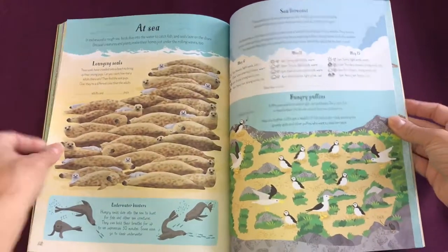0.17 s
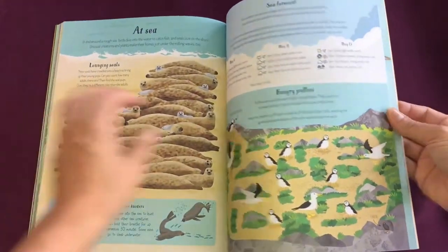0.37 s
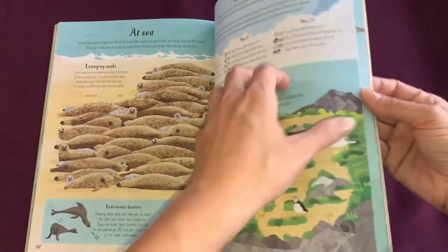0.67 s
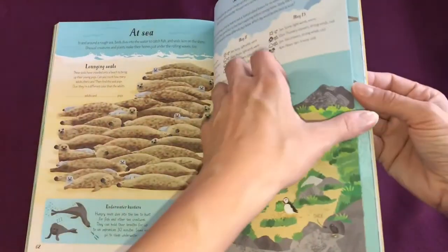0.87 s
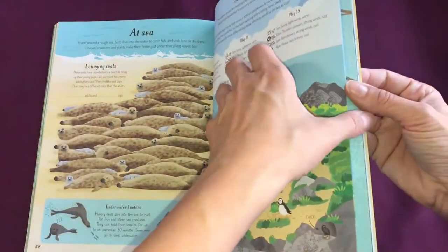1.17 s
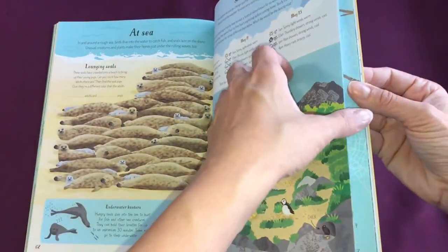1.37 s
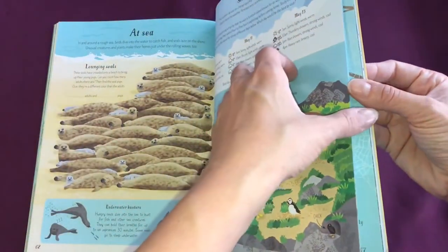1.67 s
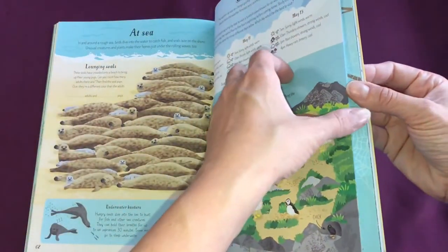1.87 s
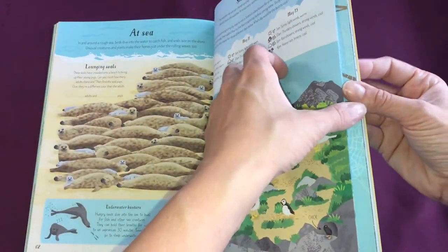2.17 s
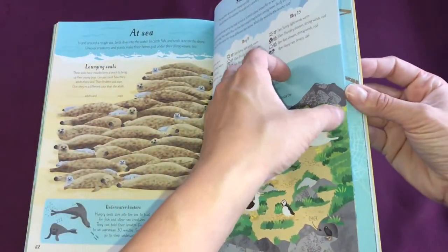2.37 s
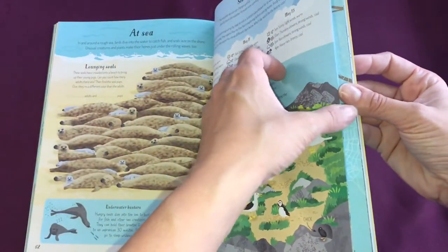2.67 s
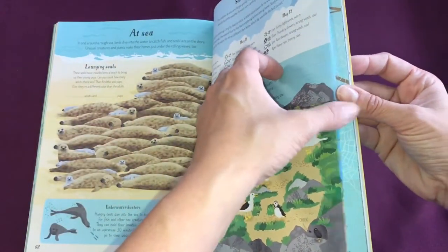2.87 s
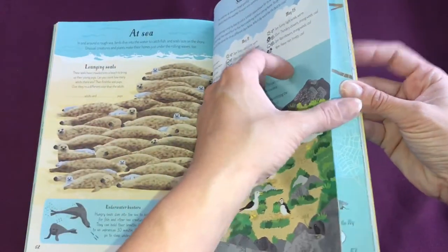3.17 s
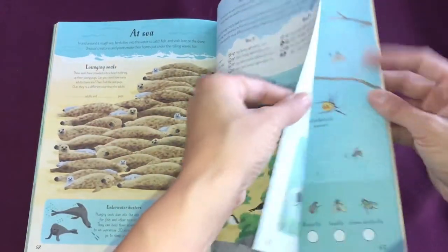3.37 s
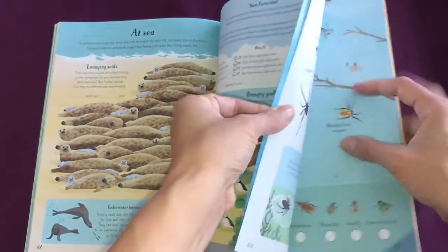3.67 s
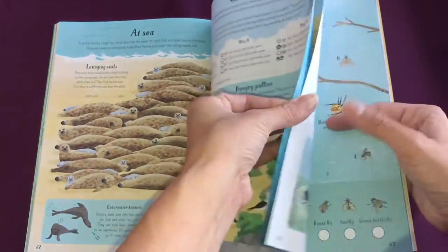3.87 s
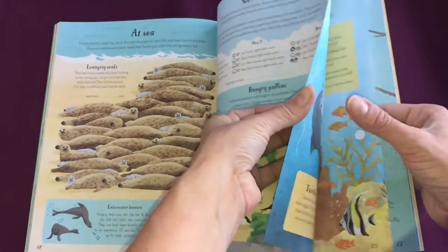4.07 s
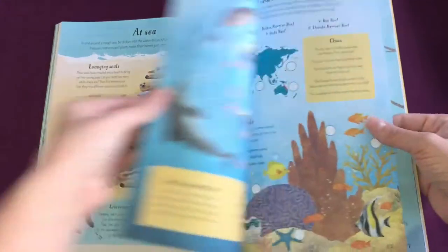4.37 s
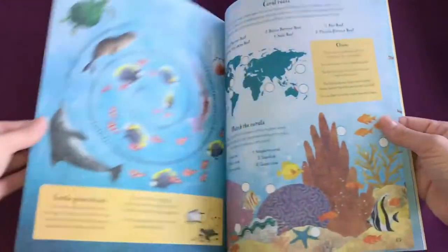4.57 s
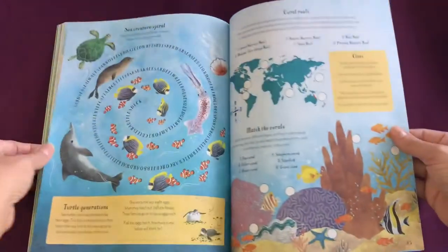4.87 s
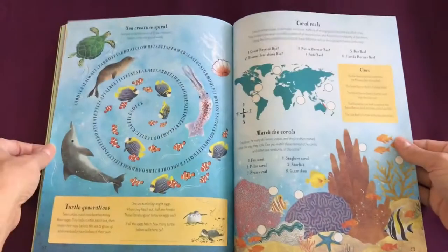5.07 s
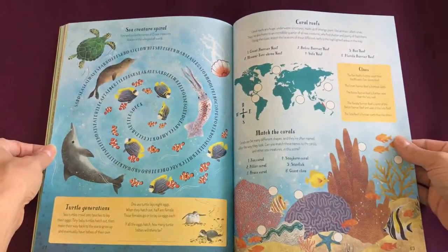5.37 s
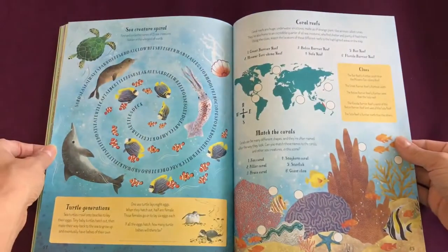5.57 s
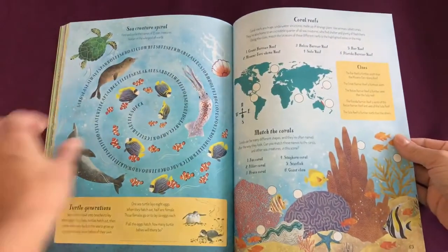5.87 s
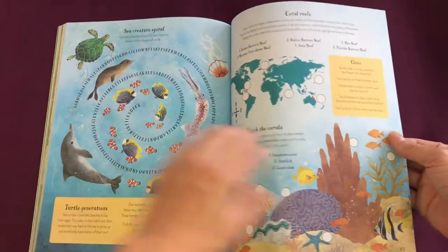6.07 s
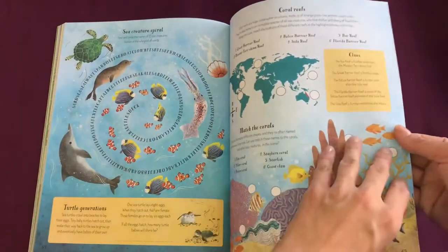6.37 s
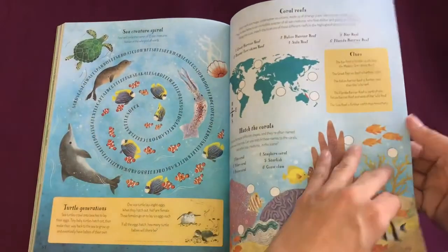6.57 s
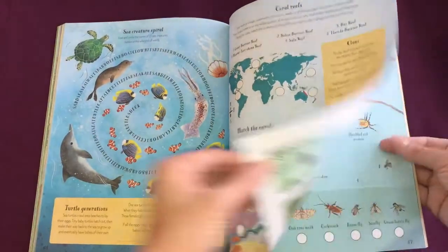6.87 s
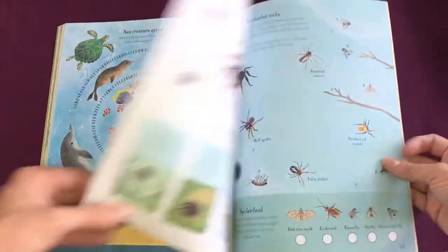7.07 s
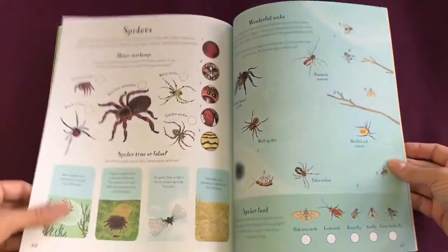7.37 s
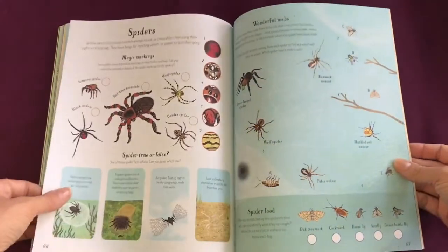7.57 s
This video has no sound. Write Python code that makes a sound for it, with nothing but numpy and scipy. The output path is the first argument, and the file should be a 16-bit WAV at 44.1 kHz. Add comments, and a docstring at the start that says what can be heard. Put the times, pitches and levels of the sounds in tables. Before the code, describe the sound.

Close to the microphone, hands handle a large glossy paperback in a small room with a steady low mains hum. Fingertips tap, scuff and squeak faintly on the paper, then a sheet is separated and turned with a cluster of crisp buckling snaps and grainy swishes. After a quieter pause with a few small clicks, a second page turns more softly and flaps down with a light pop.

```python
"""Two pages of a large paperback are turned by hand in a small room with a humming appliance.
Fingers scuff the paper (shaped clicks and hiss), slip with a click and rub on it with a dry squeak
(a gliding resonance). Each lifted sheet snaps as it buckles (short rings and noise cracks), slides over
its neighbour with a grainy swish (clicks with an echo from the page below) and pops softly as a finger
releases it or as it flaps down (a falling tone). Wavering sines and shaped noise make the hum and room."""
import sys
import numpy as np
from scipy import signal
from scipy.fft import rfft, irfft, next_fast_len
from scipy.io import wavfile
from scipy.ndimage import map_coordinates

SR = 44100
rng = np.random.default_rng(int(sys.argv[2]) if len(sys.argv) > 2 else 0)


def digitize_waveform(pressure):
    """Quantize a signal to 16-bit integers and store it at the path in sys.argv[1].

    Rows of a 2-D input are taken as channels; values are limited to [-1, 1].
    """
    field = np.atleast_2d(pressure).T
    bounded = np.clip(field, -1, 1)
    quanta = np.round(bounded * 32767).astype(np.int16)
    wavfile.write(sys.argv[1], SR, quanta)


N = 340893
TIME = np.arange(N) / SR  # seconds

# the sheet slides over its neighbour: start/s, length/s, swish level/dB, edge hiss level/dB,
# pitch of the gap halfway through/Hz, tilt/dB per octave
SLIDES = [(3.221, 0.081, -64.5, -60.5, 1180, 3), (3.325, 0.04, -57.5, -64, 1790, 7),
          (3.372, 0.069, -51.5, -55.5, 1910, 2), (3.484, 0.097, -58, -62, 1160, 2),
          (3.653, 0.04, -49.5, -48.5, 1690, 14), (3.727, 0.01, -47.5, -56, 1680, -7),
          (3.734, 0.1, -52.5, -53.5, 1730, 6), (3.877, 0.067, -56, -55.5, 1370, 1),
          (3.936, 0.048, -48.5, -54, 2110, -5.5), (4.003, 0.047, -48.5, -52.5, 1370, 2),
          (4.138, 0.1, -57.5, -63.5, 1150, 3), (4.263, 0.033, -50.5, -51.5, 1830, 1),
          (4.352, 0.12, -53.5, -67, 3500, 1), (4.47, 0.15, -61, -74, 1190, -4),
          (4.649, 0.077, -58, -65, 1300, 0), (4.82, 0.077, -56.5, -61.5, 1410, -5),
          (4.9, 0.14, -68.5, -78, 1310, 1), (6.448, 0.079, -61, -61, 2470, 3.5),
          (6.548, 0.042, -61.5, -61.5, 2500, 5), (6.614, 0.11, -58, -58.5, 2650, 6),
          (6.77, 0.044, -52, -56, 2240, -2), (6.845, 0.034, -57, -55, 1820, -6),
          (6.894, 0.025, -55, -55.5, 1750, 1), (6.933, 0.12, -53.5, -60.5, 1960, -1.5),
          (7.088, 0.15, -58, -65.5, 2260, 1), (7.358, 0.036, -60.5, -63, 1250, 7),
          (7.387, 0.12, -68, -65, 1800, -2), (7.536, 0.038, -71, -73, 1820, 0)]
# colour of scuffed paper, also of ticking creases: f/Hz, level/dB
SCUFFED_PAPER = [(300, -30), (900, -11.5), (1700, -12.5), (2300, -11), (3700, -2.5), (5000, -6.5),
                 (9500, -6), (10700, -8.5), (12500, -6.5), (15500, -12.5)]


def turning_sheets():
    """The sheet rumbles as it bends, swishes and ticks as it slides and hisses along its edge."""
    # how hard the sheet is bent as it is lifted, swung over and left to settle,
    # one curve a turn: t/s, level/dB
    bend_curves = [
        [(3.05, -76), (3.23, -72), (3.29, -60), (3.55, -60.5), (3.62, -65.5), (3.79, -52), (4.04, -57.5),
         (4.3, -61.5), (4.42, -57), (4.62, -65), (4.71, -53.5), (4.77, -72), (4.84, -61), (5.0, -66),
         (5.9, -79.5)],
        [(6.55, -92), (6.65, -60.5), (6.78, -76), (6.94, -63.5), (7.12, -69), (7.22, -60.5), (7.25, -59),
         (7.31, -74), (7.38, -52), (7.43, -77), (7.7, -75)],
    ]
    # colour of the bending rumble: f/Hz, level/dB
    flex_colour = [(150, -28), (330, 6), (560, -4.5), (860, 1.5), (1400, -4), (2200, -10), (4000, -44)]
    # colour of the edge hiss: f/Hz, level/dB
    edge_colour = [(3500, -10), (6000, 2), (7500, -0.5), (9700, 1), (10600, -6.5), (12500, -2.5),
                   (15500, -9.5)]
    # a bent sheet drags lightly all the time, and a sliding sheet bends a little
    drag_db, drag_edge_db, slide_bends_db = 1, -14, -17.5
    tick_db = -17

    bend = 0
    for turn in bend_curves:
        times, levels = np.transpose(turn)
        bend = bend + from_db(np.interp(TIME, times, levels, left=-200, right=-200))
    sliding, edge_on = 0, 0
    for start, length, swish_db, edge_db, _, _ in SLIDES:
        gain = slide_stroke(start, length)
        sliding = sliding + from_db(swish_db) * gain
        edge_on = edge_on + from_db(edge_db) * gain
    flex = np.hypot(bend, from_db(slide_bends_db) * sliding)
    slide = np.hypot(sliding, from_db(drag_db) * bend)
    edge = np.hypot(edge_on, from_db(drag_edge_db) * bend)

    grain = friction(slips_per_s=2500, spread_db=-0.5, smooth_db=0.5)
    grain = grain * from_db(2.1 * drift(47))  # uneven level
    crumple = friction(slips_per_s=770, spread_db=6.5, smooth_db=0.0)
    body = flex * page_gap(coloured(crumple, flex_colour), lag_ms=4.17, swing=0.16, echo=0.32)
    swish = swishes(grain, echo=0.42, closing=0.15)
    hiss = edge * page_gap(coloured(grain, edge_colour), lag_ms=0.588, swing=0.437, echo=0.38)
    return body + swish + hiss + from_db(tick_db) * slide * creases()


def swishes(grain, echo, closing):
    """Each slide has its own brightness and echo off the page below; the gap closes, so its peaks rise."""
    # colour of a swish before its own tilt: f/Hz, level/dB
    slide_colour = [(700, -23), (1300, 9), (1700, 6.5), (2400, 8.5), (4000, 9.5), (5000, -4), (6000, -15),
                    (9000, -52)]
    out = np.zeros(N)
    for start, length, db, _, gap_hz, tilt_db in SLIDES:
        span = slice(int((start - length) * SR), int((start + 2 * length) * SR))
        t = TIME[span]
        tilted = [(hz, level + tilt_db * np.log2(hz)) for hz, level in slide_colour]
        swish = rms_one(coloured(grain[span], tilted))
        progress = np.clip((t - start) / length - .5, -1, 1)  # 0 halfway through
        lag_s = np.exp(-closing * progress) / gap_hz
        mirrored = np.interp(t - lag_s, t, swish)
        out[span] += from_db(db) * slide_stroke(start, length)[span] * (swish + echo * mirrored)
    return out / np.hypot(1, echo)


def creases():
    """Creases give sparse dry ticks of uneven size, each a tiny fading puff of noise; rms 1."""
    ticks_per_s, spread_db, fade_s = 70, -1, 0.0015
    born = rng.random(N) < ticks_per_s / SR
    sizes = from_db(spread_db * np.minimum(rng.exponential(1, N), 2))
    bursts = signal.lfilter([1], [1, -np.exp(-1 / (fade_s * SR))], born * sizes + 1e-18)
    return rms_one(coloured(bursts * rng.standard_normal(N), SCUFFED_PAPER))


def air_pockets():
    """Friction rings the air under a curled sheet; the resonance glides as the curl changes."""
    # start/s, length/s, level/dB, resonance from f/Hz, to f/Hz, sharpness Q [no unit]
    pockets = [(0.196, 0.032, -61, 6700, 6440, 10), (0.304, 0.14, -68, 1330, 1250, 7),
               (0.31, 0.017, -63, 8300, 8300, 7), (0.347, 0.094, -72, 7300, 6970, 4),
               (0.604, 0.025, -59, 915, 930, 9.1), (0.61, 0.072, -62, 3400, 3800, 6.4),
               (1.217, 0.073, -67, 6120, 5730, 6), (2.716, 0.06, -71, 1780, 2005, 6),
               (3.66, 0.015, -49, 3740, 3700, 11), (3.659, 0.036, -46.5, 1575, 1590, 3.6),
               (4.378, 0.12, -55.5, 980, 1145, 8.6), (4.402, 0.045, -53, 4150, 3700, 6.9),
               (4.426, 0.17, -64, 9070, 7300, 6), (4.662, 0.041, -52, 7700, 9120, 5.6),
               (4.682, 0.04, -55, 606, 588, 2.2), (6.619, 0.082, -64, 4140, 5180, 5.4),
               (6.765, 0.1, -63.5, 2240, 1693, 4.8), (6.892, 0.044, -53, 1554, 1660, 6),
               (6.897, 0.053, -58, 3730, 4200, 9), (6.98, 0.082, -55, 5000, 5680, 7.5),
               (7.095, 0.058, -56.5, 6800, 7100, 16), (7.103, 0.088, -59.5, 3940, 4190, 14),
               (7.182, 0.077, -62.5, 7730, 8300, 8.7), (7.236, 0.017, -54, 897, 797, 3.3),
               (7.251, 0.17, -71, 1304, 992, 2.6)]
    grain = friction(slips_per_s=3300, spread_db=4.0, smooth_db=0.0)
    out = np.zeros(N)
    for start, length, db, from_hz, to_hz, sharpness in pockets:
        ringing = rms_one(signal.lfilter(*signal.iirpeak(from_hz, sharpness, fs=SR), grain))
        # reading the sound faster or slower moves its pitch
        speed = np.interp(TIME, [start, start + length], [1, to_hz / from_hz])
        gliding = np.interp(np.cumsum(speed) / SR, TIME, ringing)
        out += from_db(db) * slide_stroke(start, length) * gliding
    return out


def snaps_and_clicks(crack_lead, flutter_s, flutter_db, glide):
    """A buckle or a slipping fingertip rings the sheet a few cycles, with a crack and a brief flutter."""
    # the sheet buckles or a fingertip slips with a click: t/s, thump level/dB, thump f/Hz,
    # extra level of the top mode/dB, crack level/dB, crack rise/s
    snap_list = [(.176, -38.5, 3200, -6, -38, .0015), (0.616, -46, 930, -4, -36, .002),
                 (1.152, -51.5, 3200, -10, -54, .001), (1.171, -54, 4300, -6, -52, .001),
                 (1.2915, -51, 3700, -8, -33, .0014), (1.804, -60, 3000, 0, -39, .0012),
                 (1.814, -35, 1850, 7, -28, .0007), (2.2374, -37.5, 2970, -12, -47, .0005),
                 (2.2635, -44, 2900, -12, -53, .0005), (2.2964, -29.5, 3150, -15, -27, .0006),
                 (3.2697, -31.5, 3300, -21, -55, .001), (3.285, -35, 1420, -5, -40, .0008),
                 (3.3551, -31, 1850, 12, -43, .001), (3.475, -46, 930, -1, -35, .0005),
                 (3.484, -49, 620, -3, -39, .0006), (3.727, -32, 1650, -12, -25.5, 0.0033),
                 (3.761, -29.5, 835, 3, -27, 0.0015), (3.78, -31, 740, -4, -31, .001),
                 (3.8074, -25.5, 810, 7, -30, 0.0013), (3.8384, -25, 870, 3, -21.5, 0.00094),
                 (3.9338, -25, 860, 2.5, -30, 0.0012), (3.953, -37, 2000, -7, -43, .001),
                 (4.012, -23, 2310, -11, -19, .0014), (4.018, -32, 1210, 0, -44, .001),
                 (4.057, -27, 2570, -12, -27, .0004), (4.069, -39, 800, -8, -52, .001),
                 (4.0726, -29.5, 1020, -14, -57, .001), (4.246, -41, 1800, -3, -31, 0.0035),
                 (4.313, -42, 1210, 14, -46, .001), (4.328, -41.5, 980, 9, -50, .001),
                 (4.4994, -33.5, 980, 4, -37, .001), (5.413, -41.5, 1810, -1, -40, 0.0019),
                 (5.459, -41, 1900, 3, -43, 0.0028), (5.8225, -42, 3130, -10, -40, 0.0013),
                 (6.378, -49, 3400, -10, -56, 0.0025), (6.398, -49, 2600, -4, -54, .001),
                 (6.635, -37, 3900, -14, -48, .002), (6.8365, -37.5, 1650, -8, -44, .0006),
                 (6.901, -34, 1600, 8, -38, .0015)]
    # ways the sheet vibrates: multiple of the thump pitch [no unit], level/dB,
    # time to fade by 60 dB [cycles]
    sheet_modes = [(.6, -21, 4.5), (1.0, -3, 7.4), (1.9, -2.5, 4.8)]
    thumps, cracks = np.zeros(N), np.zeros(N)
    t = TIME[:SR // 10]
    for s, thump_db, hz, overtones_db, crack_db, crack_s in snap_list:
        ring = 0
        for k, (multiple, db, cycles) in enumerate(sheet_modes):
            detune = np.exp(0.031 * rng.standard_normal())
            turns = hz * multiple * detune * t
            swell = (1 - np.exp(-turns ** 2)) * np.exp(-np.log(1000) * turns / cycles)
            chirp = glide * (1 - np.exp(-turns / 2))  # short bending waves travel faster, so the pitch falls
            level = from_db(db + overtones_db * (k > 1))
            ring = ring + level * swell * np.sin(2 * np.pi * (turns + chirp))
        ring = band_pass(ring, 2, .5 * hz, min(3.6 * hz, SR / 3))  # soft paper
        flutter = rms_one(band_pass(rng.standard_normal(len(t)), 2, 0.59 * hz, min(1.71 * hz, SR / 3)))
        flutter = flutter * np.exp(-t / flutter_s)
        thump = ring / np.abs(ring).max() + from_db(flutter_db) * flutter
        add(thumps, s, from_db(thump_db - 4) * thump)
        add(cracks, s - crack_lead * crack_s, from_db(crack_db) * burst(t, crack_s))  # starts first
    bright = band_pass(rng.standard_normal(N), 1, 2200, 9000)
    return thumps + from_db(-16.0) * cracks * rms_one(bright)


def sheet_pops(rise_s, sag, sag_s, ring_db, ring_s, slap_hz, slap_s):
    """A released or landing sheet gives a pop of falling pitch, a crisp slap and a short wobble."""
    # the sheet pops as a finger releases it or as it flaps down: t/s, level/dB, final pitch f/Hz,
    # slap level against the pop/dB
    pop_list = [(3.268, -37, 732, -9), (4.5928, -38, 770, -11), (7.2340, -30, 782, -12.5)]
    t, out = TIME[:SR // 10], np.zeros(N)
    for s, db, hz, slap_db in pop_list:
        pitch = hz * (1 + sag * np.exp(-t / sag_s))
        swell = burst(t, rise_s) + 0.23 * (1 - np.exp(-t / rise_s)) * np.exp(-t / 0.017)
        pop = swell * np.sin(2 * np.pi * np.cumsum(pitch) / SR)
        slap_turns = slap_hz * t * np.exp(0.15 * np.exp(-t / slap_s))
        slap = burst(t, slap_s) * np.sin(2 * np.pi * slap_turns)
        wobble = rms_one(band_pass(rng.standard_normal(len(t)), 2, 0.83 * hz, 1.7 * hz))
        wobble = wobble * (1 - np.exp(-t / rise_s)) * np.exp(-t / ring_s)
        add(out, s, from_db(db) * (pop + from_db(slap_db) * slap + from_db(ring_db) * wobble))
    return out


def scuffs(onset_s, release_s, fade_db):
    """Brief friction of a brushing hand or a catching sheet, strongest at the first touch or catch."""
    # a hand brushes the paper or a sliding sheet catches sharply:
    # start/s, length/s, level/dB, tilt/dB per octave
    scuff_list = [(0.183, 0.043, -54.5, -3), (0.612, 0.074, -58, -2), (1.812, 0.025, -55, -6.5),
                  (2.298, 0.094, -68.5, -4), (3.472, 0.01, -48, -4), (5.826, 0.039, -61.5, -4),
                  (5.878, 0.29, -69, -6.5), (6.198, 0.023, -62.5, -4), (6.236, 0.1, -60.5, 2),
                  (6.833, 0.026, -51, -3), (7.325, 0.011, -56, -1.5), (7.664, 0.04, -62.5, -4)]
    grain = coloured(friction(slips_per_s=2300, spread_db=-3.5, smooth_db=4.0), SCUFFED_PAPER)
    out = np.zeros(N)
    for start, length, db, tilt_db in scuff_list:
        gain = stroke(length, onset_s, min(release_s, length / 2), fade_db)
        piece = np.roll(grain, -int(start * SR))[:len(gain)]
        f = np.maximum(np.fft.rfftfreq(len(gain), 1 / SR), 100)  # no tilt below 100 Hz
        tilted = irfft(rfft(piece) * from_db(tilt_db * np.log2(f)), len(gain))
        add(out, start, from_db(db) * gain * rms_one(tilted))
    return out


def finger_rubs(slip_fade_db):
    """Skin sticks and slips, driving a resonance that glides with the sheet's tension, and a thin hiss."""
    # fingertips dragging on the glossy sheet: start/s, length/s, level/dB, change over the stroke/dB,
    # resonance from f/Hz, to f/Hz, stutter depth [0-1], hiss level against the squeak/dB
    drags = [(0.258, 0.051, -68, -4, 4500, 4400, .9, -14), (0.305, 0.028, -57, -3, 4500, 4300, 0.4, -17),
             (0.344, 0.11, -60, -10, 4450, 4350, 0.15, -12), (0.979, 0.27, -78, -1, 4600, 4410, 0.4, -6),
             (1.193, 0.047, -72.5, 7, 4490, 4400, .1, -10),
             (1.239, 0.051, -61.5, 10.5, 4290, 3950, 0.2, -12),
             (2.19, 0.037, -61, -8, 4180, 4100, 0.2, -18), (2.283, 0.0073, -65, 4, 4030, 4050, .3, -15),
             (2.294, 0.066, -45.5, -19, 4190, 4210, .2, -13), (2.617, 0.081, -59, -6, 4320, 4310, .35, -20),
             (2.704, 0.09, -55, 4, 4000, 4190, 0.1, -23), (2.792, 0.032, -53, -10, 4260, 4320, 0.2, -21),
             (7.325, 0.016, -59, -1, 3070, 3060, .3, -15), (7.486, 0.019, -61, -2, 3630, 3600, 0.1, -18)]
    # a fingertip loses its grip and jumps: t/s, length/s, level/dB, hiss level against the squeak/dB
    jumps = [(2.236, 0.0092, -48.5, -14), (2.262, 0.0099, -44.5, -14), (2.885, 0.0095, -59, -6),
             (2.92, 0.0085, -52.5, -4)]
    # colour of the squeak: f/Hz, level/dB
    squeak_colour = [(600, -46), (1300, -13), (1900, -11.5), (2300, -19), (2900, -0.5), (4150, 6),
                     (4750, -9), (6700, -15), (7600, -40), (9400, -17), (11000, -42), (15500, -34)]
    # colour of the thin hiss: f/Hz, level/dB
    hiss_colour = [(5000, -17), (8000, -11), (9400, -9.5), (10600, -12), (12500, -8), (15500, -14)]
    slips = friction(slips_per_s=1000, spread_db=3.5, smooth_db=11.5)
    squeak = rms_one(coloured(slips, squeak_colour))
    hiss = rms_one(coloured(slips, hiss_colour))
    peak_hz = max(squeak_colour, key=lambda point: point[1])[0]
    stutters_per_s = 57 * np.exp(.25 * drift(30.4))  # wanders around 57
    stutter = np.cos(2 * np.pi * np.cumsum(stutters_per_s) / SR)
    out = np.zeros(N)
    for start, length, db, change_db, from_hz, to_hz, depth, hiss_db in drags:
        gain = stroke(length, onset_s=0.0027, release_s=0.0021, change_db=change_db)
        span = slice(int(start * SR), int(start * SR) + len(gain))
        # reading the squeak faster or slower moves its resonance
        speed = np.interp(TIME[span], [start, start + length], [from_hz, to_hz]) / peak_hz
        gliding = map_coordinates(squeak[span.start:][:2 * len(gain)], [np.cumsum(speed)], order=3)
        rub = (gliding + from_db(hiss_db) * hiss[span]) * (1 + depth * stutter[span])
        add(out, start, from_db(db) * gain * rms_one(rub))
    for start, length, db, hiss_db in jumps:
        gain = stroke(length, onset_s=0.00082, release_s=0.0011, change_db=slip_fade_db)
        jump = (squeak + from_db(hiss_db) * hiss)[int(start * SR):][:len(gain)]
        add(out, start, from_db(db) * gain * jump)
    return out


def room(x):
    """Echoes blur into a short tail of fading noise, dulled by the walls."""
    t60_s, first_echo_s = 0.56, .004  # t60: time to fade by 60 dB
    t = TIME[:SR // 2]
    tail = rng.standard_normal(len(t)) * np.exp(-np.log(1000) * t / t60_s) * (t > first_echo_s)
    tail = tail / np.sqrt(np.sum(tail ** 2))
    tail = signal.sosfilt(signal.butter(1, 5000, fs=SR, output="sos"), tail)
    return signal.fftconvolve(x, tail)[:N]


def background():
    """A steady mains hum with wavering motor lines, over the low rush of the room."""
    # tones of the appliance: f/Hz, rms level/dB, wander of the pitch/Hz
    hum_lines = [(59.7, -74.5, 0.35), (91.9, -62, 0.66), (119.5, -47, 0.059), (183.7, -65.5, 1.01),
                 (257.1, -64.5, 0.625), (288.8, -67, 1.62), (315.6, -72.5, 0.68), (427.5, -81, 1.81),
                 (547, -82.5, 1.7), (809, -90.5, 1.6), (1071, -88.5, 0.58), (1893, -85, 5.8),
                 (4980, -89.5, 14)]
    # rush of the room: f/Hz, level in each 1 Hz of width/dB
    rush_colour = [(25, -99.6), (45, -91), (70, -84), (150, -84), (260, -85), (380, -83), (520, -95),
                   (800, -100.3), (1300, -104.7), (2500, -112.1), (4500, -114.4), (9000, -119.4),
                   (15000, -122.8)]
    hum = 0
    for hz, db, wander_hz in hum_lines:
        turns = np.cumsum(hz + wander_hz * drift(4.36)) / SR + rng.random()
        hum = hum + from_db(db) * np.sqrt(2) * np.sin(2 * np.pi * turns)
    return hum + coloured(rng.standard_normal(N) * np.sqrt(SR / 2), rush_colour)


def friction(slips_per_s, spread_db, smooth_db):
    """Fibres catch and let go: tiny clicks of uneven size in clumps, over a smooth hiss."""
    clumping = from_db(3 * drift(40))
    born = rng.random(N) < slips_per_s * clumping / SR
    sizes = from_db(spread_db * np.minimum(rng.exponential(1, N), 4)) * rng.choice([-1, 1], N)
    return rms_one(rms_one(born * sizes) + from_db(smooth_db) * rng.standard_normal(N))


def page_gap(x, lag_ms, swing, echo):
    """Sound mirrors off the page below; the changing gap sweeps broad peaks through it."""
    lag = lag_ms * SR / 1000 * np.exp(swing * drift(1.5))  # samples
    mirrored = np.interp(np.arange(N) - lag, np.arange(N), x)
    return rms_one(x + echo * mirrored)


def slide_stroke(start, length):
    """Gain of one slide: it gathers speed and slows again; the longer it is, the softer its ends."""
    ease = 0.0018 + 0.13 * length  # seconds
    gain, span = np.zeros(N), slice(int((start - length) * SR), int((start + 2 * length) * SR))
    t = TIME[span]
    gain[span] = 1 / (1 + np.exp((start - t) / ease) + np.exp((t - start - length) / ease))
    return gain


def stroke(length, onset_s, release_s, change_db):
    """Gain of one stroke: the grip, a swell or fade, the release."""
    t = TIME[:int((length + .05) * SR)]
    gate = (1 - np.exp(-t / onset_s)) * np.exp(-np.maximum(t - length, 0) / release_s)
    return gate * from_db(change_db * np.minimum(t / length, 1))


def burst(t, rise_s):
    """A brief swell that peaks at 1 after rise_s and soon dies away."""
    return (t / rise_s * np.exp(1 - t / rise_s)) ** 2


def drift(rate):
    """Smooth chance with spread 1 that changes about rate times a second."""
    step = 40  # samples between the slow points
    r = np.exp(-2 * np.pi * rate * step / SR)
    # the first 2000 points let the smoothing settle
    slow = signal.lfilter([1], [1, -2 * r, r * r], rng.standard_normal(N // step + 2002))[2000:]
    return np.interp(np.arange(N) / step, np.arange(len(slow)), rms_one(slow))


def coloured(x, spectrum):
    """Pass x through a spectrum of f/Hz, level/dB points; beyond its ends it falls 20 dB an octave."""
    hz, db = np.transpose(spectrum)
    size = next_fast_len(len(x))
    octave = np.log2(np.maximum(np.fft.rfftfreq(size, 1 / SR), 1))
    outside = np.abs(octave - np.clip(octave, np.log2(hz[0]), np.log2(hz[-1])))
    gain = from_db(np.interp(octave, np.log2(hz), db) - 20 * outside)
    return irfft(rfft(x, size) * gain, size)[:len(x)]


def band_pass(x, order, low_hz, high_hz):
    """Keep the pitches between two frequencies."""
    return signal.sosfilt(signal.butter(order, [low_hz, high_hz], "band", fs=SR, output="sos"), x)


def from_db(db):
    """Decibels to gain."""
    return 10 ** (np.asarray(db) / 20)


def rms_one(x):
    """Scale to unit rms (average strength 1)."""
    return x / np.sqrt(np.mean(x ** 2) + 1e-20)


def add(track, s, sound):
    """Mix a sound into a track at time s, in seconds."""
    at = int(s * SR)
    track[at:at + len(sound)] += sound[:N - at]


def scene():
    """The book and its echo in the room, over the appliance and the room's own noise."""
    paper_room_db, rub_room_db = -9, -15
    rubs = finger_rubs(slip_fade_db=-9.5)
    rustle = turning_sheets() + air_pockets() + scuffs(onset_s=0.0022, release_s=0.028, fade_db=-4.5)
    snapping = snaps_and_clicks(crack_lead=0.4, flutter_s=0.008, flutter_db=-15.0, glide=0.057)
    pops = sheet_pops(rise_s=0.00094, sag=0.81, sag_s=0.0032, ring_db=-6, ring_s=0.01,
                      slap_hz=2570, slap_s=0.0011)
    paper = rustle + snapping + pops
    echoes = room(from_db(paper_room_db) * paper + from_db(rub_room_db) * rubs)
    return (paper + rubs + echoes + background())[None]


def record(dry):
    """The top is cut steeply above 15.9 kHz."""
    return signal.sosfilt(signal.ellip(10, .1, 70, 15900, fs=SR, output="sos"), dry)


dry = scene()
out = record(dry)
digitize_waveform(out)
```